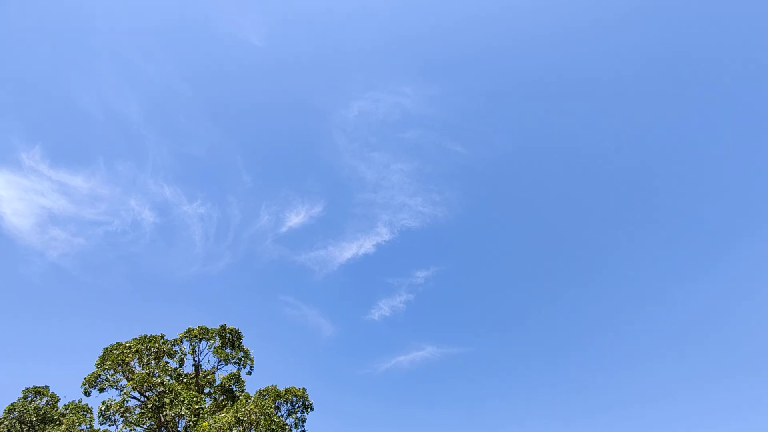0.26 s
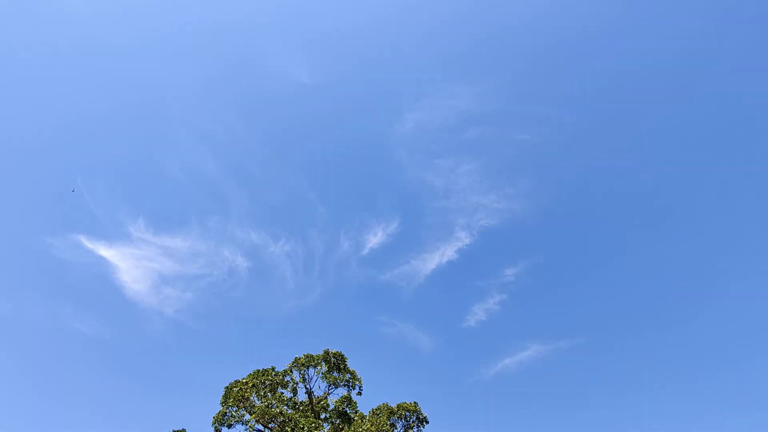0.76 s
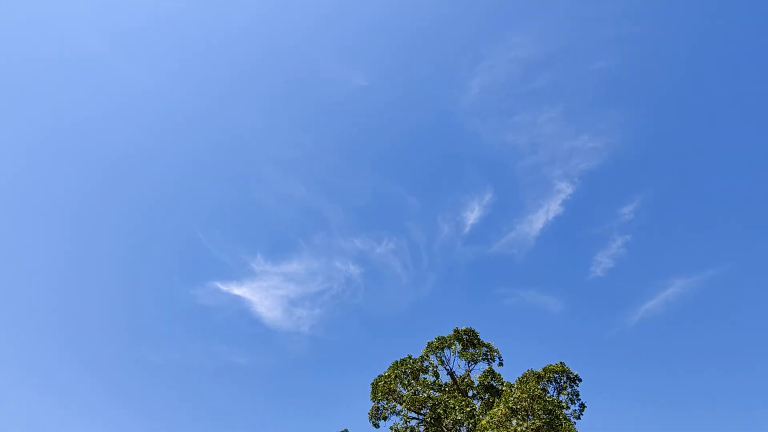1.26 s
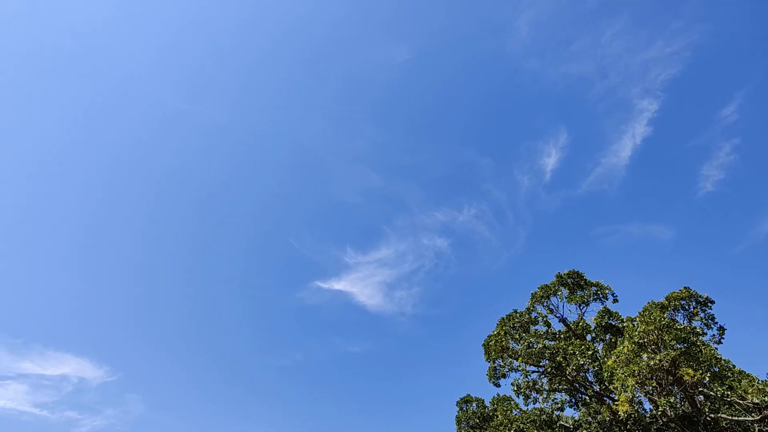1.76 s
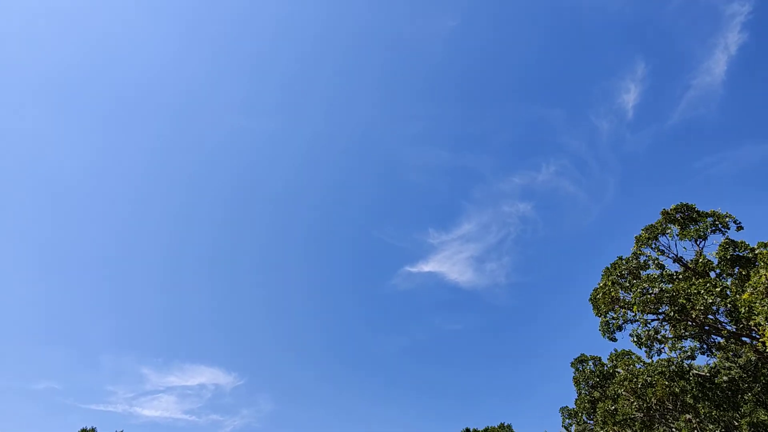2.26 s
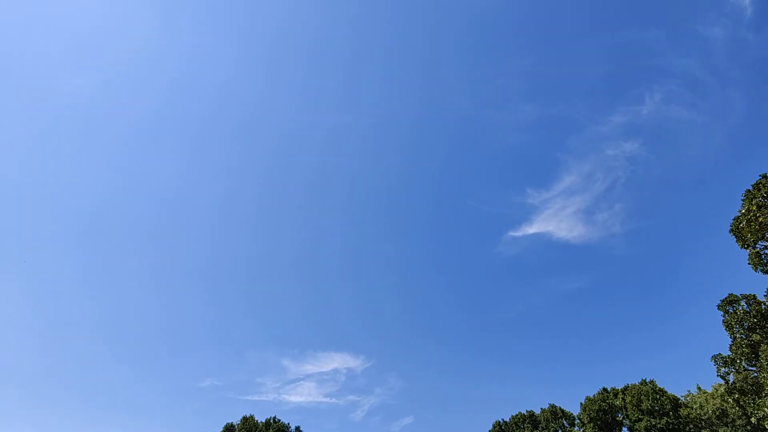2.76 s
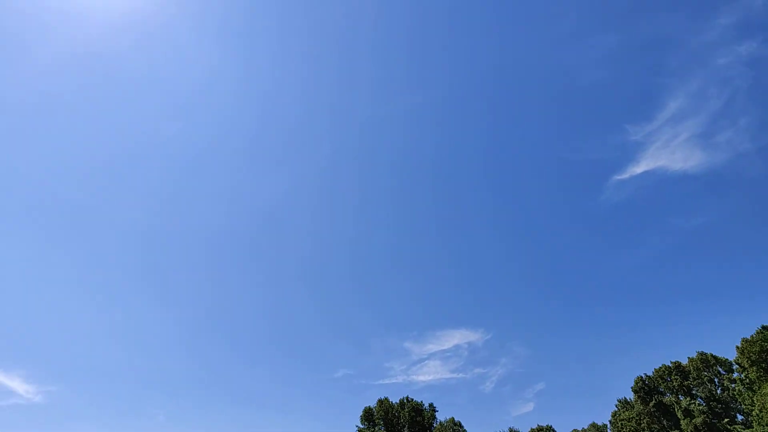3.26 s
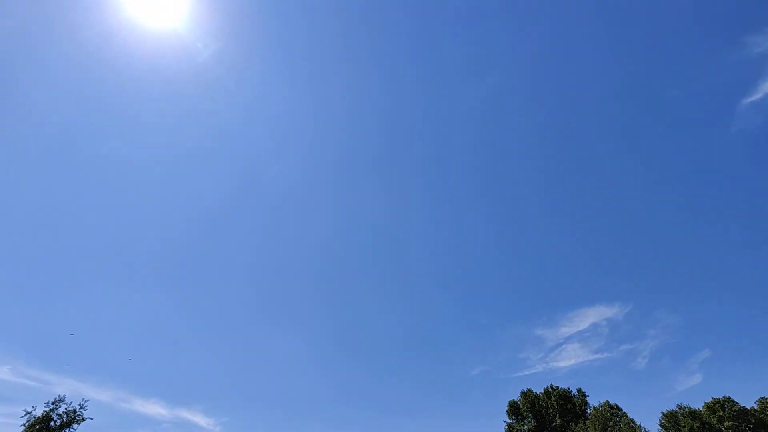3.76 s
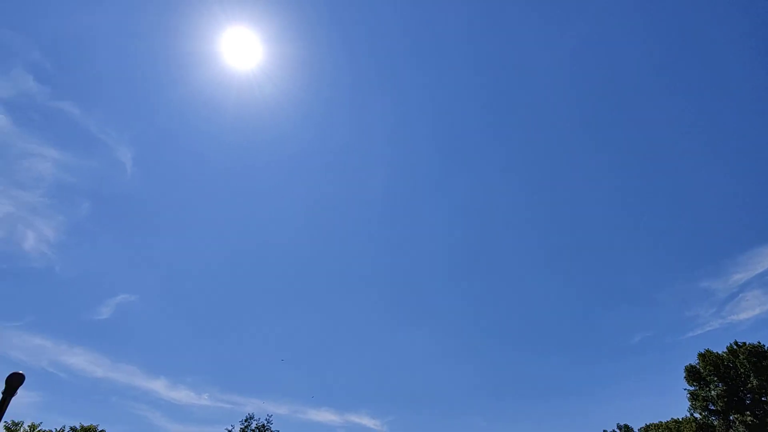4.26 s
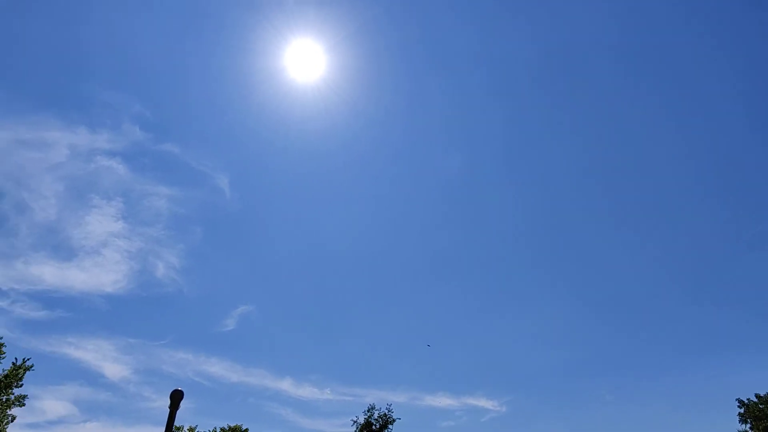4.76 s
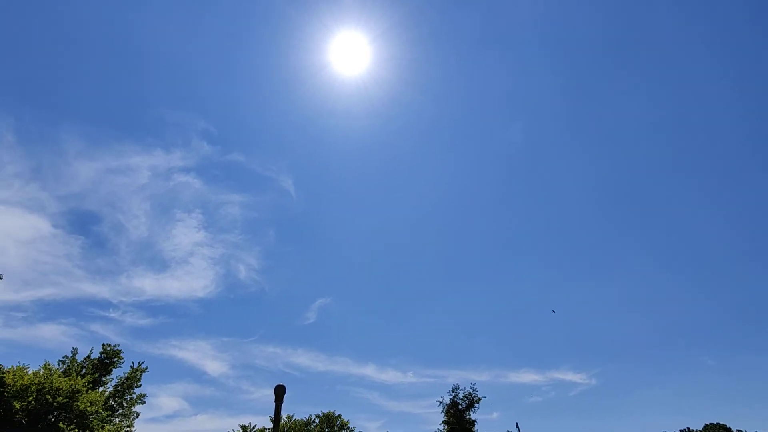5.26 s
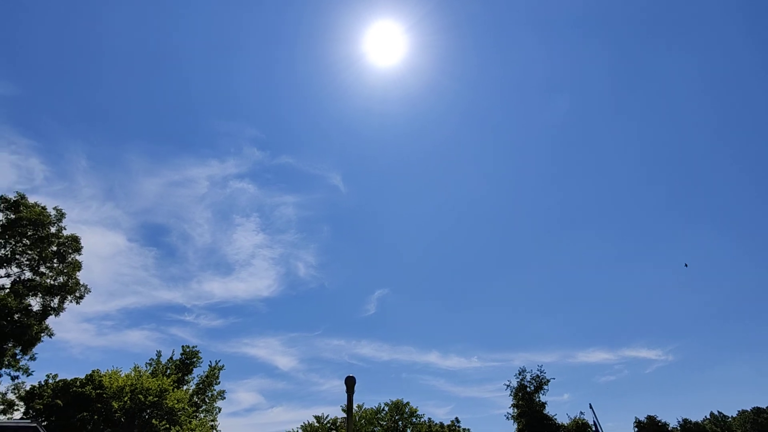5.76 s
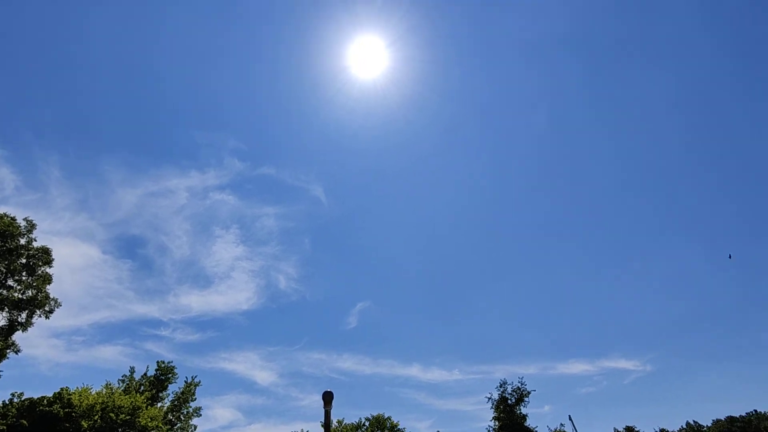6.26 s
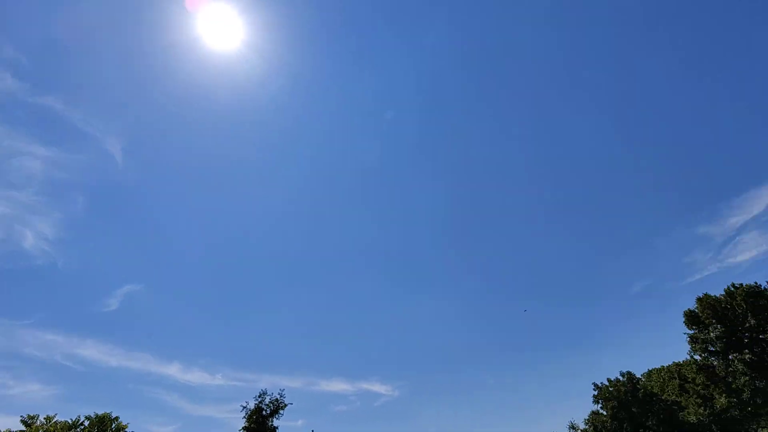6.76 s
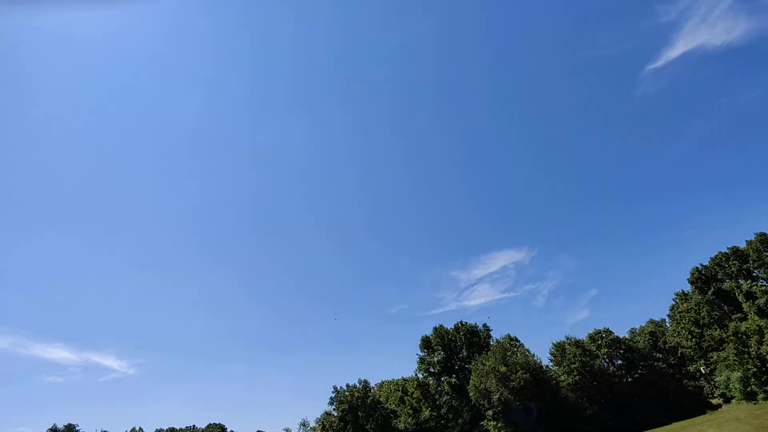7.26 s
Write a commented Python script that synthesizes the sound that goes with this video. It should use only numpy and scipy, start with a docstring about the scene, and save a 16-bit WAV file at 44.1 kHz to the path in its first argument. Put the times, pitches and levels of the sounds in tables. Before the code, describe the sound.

A quiet open field ringed by trees, heard close through a handheld stereo phone. Martins twitter overhead from the start: three-stroke chirps at 0, 0.25 and 1.35 seconds, sliding whistles and quick bubbling trills falling around two kilohertz, with a short grainy buzz at 1.6 to 1.85. Trills crowd 1.7 to 3.9, each call doubled slightly by the ground and blurred by a soft leafy echo. The birds begin left and shift right. Low wind thumps hit mostly the right side near 0.85, heavily at 1.45-1.75 and 2.5-2.75, then 3.55-3.9, with lighter bumps around 5.5 and 5.8. Soft grass swishes pass underfoot until 4.25, when a sharp finger tick snaps on the case, mainly left. Whistles follow at 4.4-4.7; a near-silent lull of faint air and insect hiss lasts until about 5.95, then sparse calls at 6.2, 6.5 and 7.1.

```python
"""Martins twitter over a field: falling whistles, trills and buzzes are made from gliding near-sine tones.
The grass throws each call back once, and the ring of trees scatters the calls into a noisy tail.
A phone hears it with two microphone ports while it turns: wind thumps on the ports as short pulses,
feet swish in the grass as swelling hiss, and fingers tick on the case as scrapes with short rings.
Filtered noise far off makes the leaves, the traffic and the hiss of insects."""
import sys
import numpy as np
from scipy import signal
from scipy.fft import rfft, irfft, next_fast_len
from scipy.io import wavfile
from scipy.ndimage import uniform_filter1d, map_coordinates

SR = 44100
rng = np.random.default_rng(int(sys.argv[2]) if len(sys.argv) > 2 else 0)


def store_pcm(level_fs):
    """Save levels as 16-bit WAV."""
    pcm = np.round(np.clip(level_fs, -1, 1) * 32767).astype(np.int16)
    wavfile.write(sys.argv[1], SR, np.atleast_2d(pcm).T)


N = 331191  # length of the scene in samples

# Tone colour of the distant air: pitch_hz, relative_level_db
FIELD_COLOUR = [(88, -33), (150, -17.5), (201, -4.5), (341, -4.5), (649, -9.5), (941, -8), (2920, -20.5),
                (5000, -23), (5800, -20), (7300, -18.5), (8400, -26), (16000, -40.5)]
# Left-right balance of the distant air: pitch_hz, left_minus_right_db
FIELD_BALANCE = [(200, 3), (700, 4.5), (1300, 9), (2400, -0.5), (6000, -1.5)]
FIELD_DB = -75
INSECT_HZ, INSECT_WIDTH_HZ, INSECT_DB = 5960, 520, -83

# Steady breeze on the ports: time_s, left_level_db, right_level_db
BREEZE_LEVELS = [(0, -56, -57.5), (.7, -58, -50.5), (1.1, -57, -62.5), (2.2, -71, -52.5), (2.7, -57.5, -54),
                 (3.3, -64, -54.5), (4.1, -69, -46), (4.6, -64.5, -69), (5.6, -64, -59.5), (7.5, -71, -67)]
# Eddies that burst on a port: port (L or R), peak_time_s, peak_db, pitch_hz
WIND_THUMPS = [("L", .176, -27.5, 74), ("L", .65, -38.5, 70), ("R", 0.84, -21.5, 61),
               ("R", 0.984, -28, 81.5), ("R", 1.112, -30.5, 55.7), ("L", 1.416, -33, 73),
               ("R", 1.436, -13, 98), ("R", 1.472, -16.5, 126), ("R", 1.506, -17.5, 147),
               ("R", 1.57, -17, 88), ("R", 1.624, -19, 137), ("R", 1.677, -19.5, 68), ("R", 1.738, -27, 92),
               ("R", 2.05, -31, 78.4), ("R", 2.525, -21, 110), ("R", 2.537, -21, 100),
               ("R", 2.565, -13.5, 75), ("R", 2.585, -18, 105), ("R", 2.609, -15.5, 88),
               ("R", 2.627, -28, 210), ("R", 2.635, -13, 125), ("R", 2.667, -23, 80),
               ("R", 2.71, -12.5, 85), ("R", 2.739, -29, 112.1), ("R", 3.547, -16, 106.5),
               ("R", 3.595, -19.5, 78), ("R", 3.616, -16.5, 84), ("R", 3.663, -18.5, 78),
               ("R", 3.75, -26, 74), ("R", 3.849, -28, 69), ("R", 3.873, -28, 99), ("R", 3.906, -24, 75),
               ("R", 4.143, -31, 61.5), ("R", 4.928, -40.5, 62), ("R", 5.443, -38, 64.5),
               ("R", 5.488, -25.5, 84), ("R", 5.747, -37.5, 64), ("R", 5.814, -28, 78.5)]

# Grass under turning feet: peak_time_s, half_length_ms, level_db, left_minus_right_db
GRASS_SWISHES = [(0.769, 38, -66.5, -7), (1.349, 35, -69, -4), (1.465, 20, -70, -6), (2.093, 52, -60.5, -5),
                 (2.75, 66, -74, -11.5), (3.04, 22, -68.5, -4), (3.422, 38, -67.5, -5),
                 (4.022, 54, -73, -2), (4.25, 13.7, -55.5, 6)]
# Tone colour of brushed grass: pitch_hz, relative_level_db
GRASS_COLOUR = [(1500, -4.5), (3500, -14), (6000, 3), (10000, -7.5), (15000, -17)]

# Fingers shifting on the case: start_s, bright_level_db, dull_level_db
GRIP_TICKS = [(1.597, -65, -58.5), (4.221, -58, -70), (4.2328, -42, -38), (4.25, -27.5, -41.5),
              (4.255, -36.5, -45)]
# Rings of the case, the first two bright and the rest dull: pitch_hz, fade_60db_ms, left_db, right_db
CASE_RINGS = [(6880, 3, -9, 9.5), (3100, 3.4, -25, -7), (486, 26, 2.5, -29), (830, 9.5, 7, -2.5)]

# Where the flock is as the phone turns: time_s, left_lags_right_ms, left_minus_right_db
FLOCK_BEARING = [(0, -0.46, 6.5), (1.35, -0.24, -3), (2.3, -0.044, -1.5), (3.3, 0.37, -4), (3.9, 0.39, -7),
                 (4.4, 0.46, -7), (6.2, 0.5, -6), (7.1, 0.41, -17.5)]
TREES_DB, TREES_RISE_S, TREES_T60_S = -4.2, .007, 0.6  # T60: time for the low part to fade by 60 dB
TRILL_TREES_DB = -2.5  # how much less of the trills reaches the trees
GROUND_MS, GROUND_DB = 3, -5

# The second overtone of the voice is set for a stroke sung at LOUD_DB; overtones peak near BEAK_HZ
OVERTONE_DB, LOUD_DB = -12, -45
BEAK_HZ, BEAK_WIDTH_HZ = 7170, 560

# Buzzy calls: start_s, length_ms, first_pitch_hz, last_pitch_hz, peak_db
BUZZ_CALLS = [(1.611, 64, 4330, 3700, -52), (1.67, 200, 4000, 3760, -60)]
# Pulse rate, share of the pitch swept each way, unevenness of the rate (log units) and of the level
BUZZ_HZ, BUZZ_SWEEP, BUZZ_JITTER, BUZZ_SCATTER_DB = 140, .065, .18, 3.5

# Three-stroke calls: main_start_s, main_length_ms, main_first_pitch_hz, main_peak_db, lead_in_peak_db,
# low_stroke_delay_ms, low_stroke_length_ms, low_stroke_peak_db
THREE_STROKE_CALLS = [(.013, 13.7, 3960, -43.5, -67, 25, 22, -46.5),
                      (.259, 11, 3950, -47.5, -80, 24, 34, -51),
                      (1.342, 7.1, 3890, -45.5, -57, 11, 18, -52.5),
                      (3.543, 12, 4020, -51, -56, 18, 15.6, -47),
                      (4.607, 19.2, 3950, -45.5, -55.5, 24, 23.5, -51.5),
                      (6.226, 14.7, 3750, -46, -53, 20, 38, -59),
                      (7.092, 12.8, 3750, -43.5, -60, 22, 24, -58)]
LEAD_IN_MS, LEAD_IN_HZ, LEAD_IN_END_HZ = 11, 4400, 4180
MAIN_END_HZ, LOW_HZ, LOW_END_HZ = 2900, 2670, 1880

# Trills of evenly spaced pips, before small random changes: first_pip_s, last_pip_s, pip_count,
# first_pitch_hz, last_pitch_hz, peak_db, loudest_place (0 to 1), pip_half_length_ms,
# pitch_fall (share of the pitch lost in one half length)
TRILL_CALLS = [(.096, .136, 4, 2500, 2250, -46, .5, 8, .24), (.368, .452, 5, 2450, 2300, -44, .6, 7, .2),
               (.474, .526, 3, 1850, 2200, -55, .5, 8, .17), (.672, .766, 5, 2000, 2150, -56, .6, 7.5, .21),
               (1.558, 1.6, 3, 2050, 2020, -58, .3, 9.5, .27),
               (1.688, 1.72, 5, 2350, 2300, -50, .6, 4.5, .2),
               (1.746, 1.838, 5, 2050, 2300, -54, .6, 9, .27),
               (1.899, 2.02, 7, 2560, 2450, -61, .6, 7, .05),
               (2.06, 2.129, 4, 2150, 2150, -55.5, .65, 8.5, .27),
               (2.2745, 2.301, 2, 2250, 2350, -47, .5, 3.5, .22),
               (2.282, 2.335, 3, 2050, 2280, -42.5, .3, 8, .27),
               (2.408, 2.49, 4, 1850, 2300, -53, .6, 7, .22),
               (2.395, 2.499, 5, 2080, 2200, -44.5, .55, 9.5, .26),
               (2.604, 2.653, 3, 1950, 2250, -55, .6, 9.5, .27),
               (2.715, 2.772, 4, 2800, 2750, -59.5, .5, 5, .07),
               (2.776, 2.804, 2, 2037, 2084, -44, .57, 9.5, .27),
               (2.876, 2.928, 3, 2350, 2180, -54, .35, 9.5, .27),
               (3.242, 3.292, 3, 2150, 2380, -51.5, .7, 9, .21),
               (3.395, 3.466, 4, 2400, 2230, -52, .55, 7, .17),
               (3.505, 3.535, 4, 3300, 3250, -65, .5, 5, .08), (3.575, 3.65, 5, 3500, 2900, -58, .2, 8, .2),
               (3.528, 3.549, 3, 2300, 2250, -56, .5, 5, .15),
               (3.588, 3.64, 5, 2250, 2250, -45.5, .6, 9, .2),
               (3.783, 3.839, 3, 2100, 2100, -44.5, .7, 8.5, .25),
               (3.866, 3.938, 4, 2250, 2200, -54, .5, 7.5, .2),
               (5.951, 6.006, 3, 2080, 2190, -66.5, .7, 9.5, .27),
               (6.157, 6.208, 3, 2030, 2210, -65.5, .7, 9.5, .27),
               (6.515, 6.575, 4, 2950, 2950, -59, .6, 4.5, .06),
               (6.559, 6.628, 4, 2450, 2250, -61, .5, 10, .22)]
TRILL_ARCH_DB, PIP_SCATTER_DB = 18, 1.2  # arch: fall over a whole trill length from the loudest pip

# Other whistled tones, among them the high overtones of the low strokes near 1.353 s and 7.108 s: start_s,
# length_ms, first_pitch_hz, last_pitch_hz, peak_db
OTHER_WHISTLES = [(0.064, 23.7, 2694, 1720, -46.5), (0.127, 21, 3095, 2850, -48.5),
                  (0.182, 18, 2880, 2770, -48), (0.231, 12, 2610, 2640, -54),
                  (0.326, 47, 2450, 1925, -51.5), (1.327, 9, 3570, 3400, -50.5),
                  (1.353, 18, 5340, 3900, -57), (2.43, 20, 2150, 1550, -55), (3.655, 16, 2700, 1950, -50),
                  (3.768, 24, 2050, 1500, -61), (3.833, 7, 7250, 6900, -61), (4.369, 27, 3250, 2480, -53),
                  (4.397, 32, 2450, 2030, -50), (4.428, 16, 2030, 1620, -56), (4.653, 24, 3200, 2350, -59),
                  (4.677, 17, 2350, 1700, -54), (4.704, 38, 2380, 1930, -51), (6.257, 10, 2450, 2280, -53),
                  (6.295, 10, 2490, 2330, -54), (7.108, 20, 5900, 4500, -66),
                  (7.148, 19, 2560, 2270, -51.5)]


def undb(db):
    """Turn a dB value into a gain."""
    return 10 ** (np.asarray(db) / 20)


def unit(x):
    """Scale a sound to an average strength (rms) of 1."""
    return x / np.sqrt(np.mean(x ** 2))


def curve(table, column):
    """Read one column of a time table, sample by sample."""
    rows = np.array(table)
    return np.interp(np.arange(N) / SR, rows[:, 0], rows[:, column])


def on_log(table, hz):
    """Read a pitch table by drawing straight lines on a log-pitch axis."""
    rows = np.array(table)
    return np.interp(np.log(hz + 1), np.log(rows[:, 0]), rows[:, 1])


def shaped(gain):
    """Make two unrelated noises whose tone colour is gain(pitch in Hz)."""
    size = next_fast_len(N)
    hz = np.arange(size // 2 + 1) * SR / size
    spectrum = rfft(rng.standard_normal((2, size))) * gain(hz)
    return unit(irfft(spectrum, size)[:, :N])


def walk(rate):
    """Make two random wandering curves of rms 1, with `rate` new values a second joined by slopes."""
    hold = int(SR / rate)
    steps = np.repeat(rng.standard_normal((2, N // hold + 1)), hold, axis=1)
    return unit(uniform_filter1d(steps, hold)[:, :N])


def add(out, s, sound):
    """Mix a sound in from time s."""
    i = max(int(s * SR), 0)
    out[..., i:i + sound.shape[-1]] += sound[..., :N - i]


def delayed(x, lag, order):
    """Delay a sound by a changing number of samples, reading between samples."""
    return map_coordinates(x, [np.arange(N) - lag], order=order)


def field():
    """Far leaves and traffic are broad noise; insects are a wavering narrow band of noise."""
    side = np.array([[.5], [-.5]])
    air = shaped(lambda hz: undb(on_log(FIELD_COLOUR, hz) + side * on_log(FIELD_BALANCE, hz)))
    insects = shaped(lambda hz: 1 / (1 + (2 * (hz - INSECT_HZ) / INSECT_WIDTH_HZ) ** 2))
    air_gain = undb(FIELD_DB + 0.58 * walk(2.926))
    insect_gain = undb(INSECT_DB + 2.4 * walk(9)[0])
    return air_gain * air + insect_gain * insects


def wind(edge=4.09, scatter=0.97, wake_db=-19.5, wake_s=0.036, rise_s=.012):
    """Eddies give suction pulses with a rumbling wake around them, over a flickering breeze."""
    thumps, wake = np.zeros((2, N)), np.zeros((2, N))
    t = np.arange(-SR // 8, SR // 8) / SR
    turns = scatter * rng.standard_normal(len(WIND_THUMPS))  # random shape of each pulse, in radians
    for (port, s, db, hz), turn in zip(WIND_THUMPS, turns):
        side = "LR".index(port)
        # a pointed pulse: its spectrum peaks at hz and falls off exponentially
        pulse = -np.real(np.exp(1j * turn) * (1 - 2j * np.pi * hz * t / edge) ** -(edge + 1))
        swell = np.exp(-(t / np.where(t < 0, rise_s, wake_s)) ** 2)
        add(thumps[side], s + t[0], undb(db) * pulse)
        add(wake[side], s + t[0], undb(db + wake_db) * swell)
    breeze_db = np.array([curve(BREEZE_LEVELS, column=1), curve(BREEZE_LEVELS, column=2)])
    breeze = undb(breeze_db + 6 * walk(22))
    low = shaped(lambda hz: hz ** 2 / (hz ** 2 + 30 ** 2) * np.exp(-hz / 45))
    rumble = shaped(lambda hz: hz ** 2 / (hz ** 2 + 45 ** 2) * np.exp(-hz / 62))
    return thumps + breeze * low + wake * rumble


def feet():
    """Blades of grass brush past the feet: grainy hiss that swells and fades."""
    hiss = shaped(lambda hz: undb(on_log(GRASS_COLOUR, hz)) * (hz > 400))
    hiss = hiss + 0.28 * hiss[::-1]  # each port also hears some of the other side
    grains = hiss * undb(2.4 * walk(600))
    swell, t = np.zeros((2, N)), np.arange(N) / SR
    for s, ms, db, pan_db in GRASS_SWISHES:
        side_db = np.array([[pan_db], [-pan_db]]) / 2
        swell += undb(db + side_db) * np.exp(-abs((t - s) * 1000 / ms) ** 1.26)
    return unit(grains) * swell


def grip():
    """Each tick is a short noisy scrape that makes the case ring at its own pitches."""
    out, t = np.zeros((2, N)), np.arange(SR // 20) / SR
    for s, bright_db, dull_db in GRIP_TICKS:
        for k, (hz, ms, *port_db) in enumerate(CASE_RINGS):
            ring = np.sin(2 * np.pi * hz * t) * undb(-60 * t * 1000 / ms)
            tick_db = (bright_db, dull_db)[k // 2]
            add(out, s, undb(tick_db + np.array(port_db))[:, None] * ring)
        scrape = uniform_filter1d(rng.standard_normal((2, len(t))), size=3) * np.exp(-t / 0.00088)
        add(out, s, undb(bright_db - 4) * scrape)
    return out


def trees(x, treble_share=.48, sway_ms=0.7, leaf_hz=2250):
    """Swaying leaves scatter the calls into a tail that builds up, flutters, smears in pitch and dulls."""
    t = np.arange(SR) / SR
    noise = rng.standard_normal((2, SR)) * undb(3.5 * walk(60)[:, :SR])
    low = signal.sosfiltfilt(signal.butter(2, 3300, fs=SR, output="sos"), noise)
    low_tail = low * undb(-60 * t / TREES_T60_S)
    treble_tail = (noise - low) * undb(-3 - 60 * t / (TREES_T60_S * treble_share))
    tail = (low_tail + treble_tail) * (1 - np.exp(-(t / TREES_RISE_S) ** 2))
    tail /= np.sqrt(np.sum(tail ** 2, axis=1, keepdims=True))
    # leaves are too small to turn long waves
    tail = signal.lfilter(*signal.butter(2, leaf_hz, "high", fs=SR), tail)
    wet = signal.fftconvolve(x[None], tail, axes=1)[:, :N]
    sway = uniform_filter1d(walk(30), SR // 50) * sway_ms * SR / 1000
    moving = np.array([delayed(v, d, order=3) for v, d in zip(wet, sway)])
    return undb(TREES_DB + 1.6 * walk(70)) * moving


def ground(x):
    """The grass throws each call back a moment later, so that glides beat."""
    lag = (GROUND_MS + 0.606 * walk(3.7)[0]) * SR / 1000
    return x + undb(GROUND_DB) * delayed(x, lag, order=1)


def ports(x):
    """The calls reach the two ports at slightly different times and levels as the phone turns."""
    lag = curve(FLOCK_BEARING, column=1) * SR / 1000
    pan_db = curve(FLOCK_BEARING, column=2)
    side = np.array([[.5], [-.5]])
    return np.array([delayed(x, d, order=3) for d in side * lag]) * undb(side * pan_db)


def glide(hz, shape, db, third_db=-60):
    """A near-sine voice; overtones are strongest near the beak's ring, and the second grows with effort."""
    phase = 2 * np.pi * np.cumsum(hz) / SR
    second_ring, third_ring = [1 / (1 + ((k * hz - BEAK_HZ) / BEAK_WIDTH_HZ) ** 2) ** 2 for k in (2, 3)]
    second = undb(OVERTONE_DB + db - LOUD_DB) * (second_ring + .02) * np.sin(2 * phase)
    third = undb(third_db) * third_ring * np.sin(3 * phase)
    return undb(db) * shape * (np.sin(phase) + second + third)


def buzz():
    """A sinking tone chopped into uneven pulses that each dive in pitch."""
    out = np.zeros(N)
    rate = BUZZ_HZ * np.exp(BUZZ_JITTER * walk(BUZZ_HZ)[0])
    turn = np.pi * np.cumsum(rate) / SR  # half a turn for each pulse
    size = undb(BUZZ_SCATTER_DB * walk(BUZZ_HZ)[0])
    for s, ms, first, last, db in BUZZ_CALLS:
        u = np.arange(0, 1, 1000 / (ms * SR))
        part = slice(int(s * SR), int(s * SR) + len(u))
        hz = first * (last / first) ** u * (1 + BUZZ_SWEEP * np.sin(2 * turn[part]))
        shape = np.sin(np.pi * u) ** .35 * np.sin(turn[part]) ** 2 * size[part]
        add(out, s, undb(db) * shape * np.sin(2 * np.pi * np.cumsum(hz) / SR))
    return out


def pips():
    """A trill steps evenly in time and pitch, swells to its loudest pip and fades."""
    rows = []
    for first, last, count, first_hz, last_hz, db, top, half_ms, fall in TRILL_CALLS:
        u = np.linspace(0, 1, round(count))
        times = first + (last - first) * u
        pitches = first_hz + (last_hz - first_hz) * u
        levels = db - TRILL_ARCH_DB * (u - top) ** 2
        rows += zip(times, pitches, levels, np.full_like(u, half_ms), np.full_like(u, fall))
    return rows


def trills(droop=0.067, vary=.08, upper_hz=3350, upper_db=-2, lead_s=.012):
    """Varied pips fall ever more steeply, each led by a high stroke that is much fainter on soft pips."""
    out = np.zeros(N)
    rows = pips()
    chances = rng.standard_normal((len(rows), 4))
    for (s, hz, db, half_ms, fall), (vary_length, vary_fall, vary_upper, vary_level) in zip(rows, chances):
        ms = half_ms * np.exp(vary * vary_length)
        db = db + PIP_SCATTER_DB * vary_level
        u = np.arange(-1, 1, 1000 / (ms * SR))
        dive = 1 - fall * np.exp(vary * vary_fall) * u - droop * u ** 2
        shape = np.cos(np.pi * u / 2) ** 2
        start = s - ms / 1000
        add(out, start, glide(hz * dive, shape, db))
        high_db = 1.5 * db + upper_db + 1.6 * vary_upper
        add(out, start - lead_s, glide(upper_hz * np.sqrt(dive), shape ** 2, high_db))
    return out


def strokes():
    """Each three-stroke call is a short high lead-in, a steep main stroke and a lower stroke."""
    rows = []
    for s, ms, hz, db, lead_db, delay_ms, low_ms, low_db in THREE_STROKE_CALLS:
        rows.append((s - LEAD_IN_MS / 1000, LEAD_IN_MS, LEAD_IN_HZ, LEAD_IN_END_HZ, lead_db))
        rows.append((s, ms, hz, MAIN_END_HZ, db))
        rows.append((s + delay_ms / 1000, low_ms, LOW_HZ, LOW_END_HZ, low_db))
    return rows


def whistles(table, bend, spill=.15, sharp=.95, fade=.5):
    """Whistled tones glide between two pitches, fastest around their start when bend is below 1."""
    out = np.zeros(N)
    for s, ms, first, last, db in table:
        u = np.arange(-spill, 1 + spill, 1000 / (ms * SR))  # the faint ends spill past the length
        arch = np.sin(np.pi * (u + spill) / (1 + 2 * spill)).clip(0) ** sharp
        shape = arch * np.exp(fade * (.5 - u))
        hz = first * (last / first) ** (np.sign(u) * abs(u) ** bend)
        add(out, s - spill * ms / 1000, glide(hz, shape, db, third_db=-24.5))
    return out


def scene():
    """Add the background, the phone's own noises and the calls at the two ports."""
    calls = whistles(strokes(), bend=.83) + whistles(OTHER_WHISTLES, bend=.65) + buzz()
    high = trills()  # sung higher up, partly clear of the trees
    direct = ports(ground(calls + high))
    scattered = trees(calls + undb(TRILL_TREES_DB) * high)
    return field() + wind() + feet() + grip() + scattered + direct


def record(dry):
    """The phone cuts the top of the treble, above 15700 Hz."""
    return signal.sosfilt(signal.ellip(10, .2, 60, 15700, fs=SR, output="sos"), dry)


dry = scene()
out = record(dry)
store_pcm(out)
```